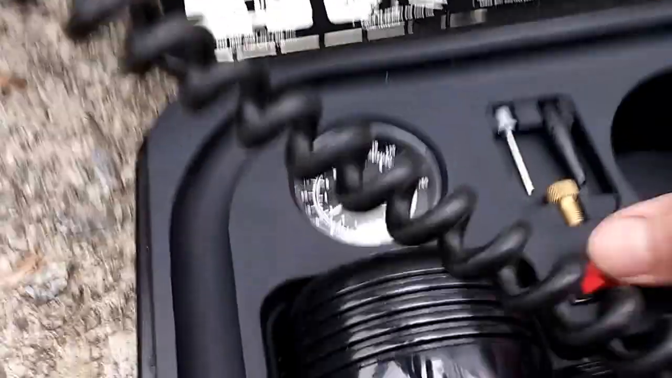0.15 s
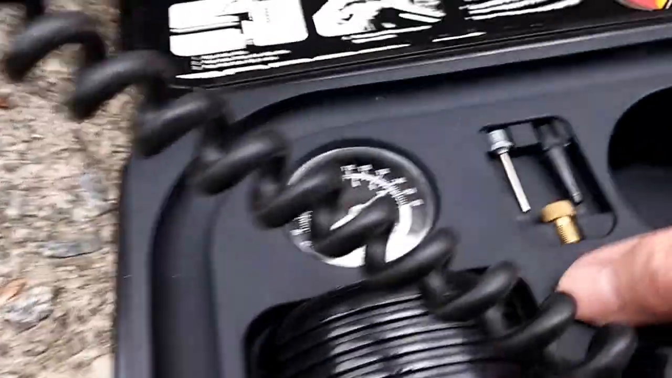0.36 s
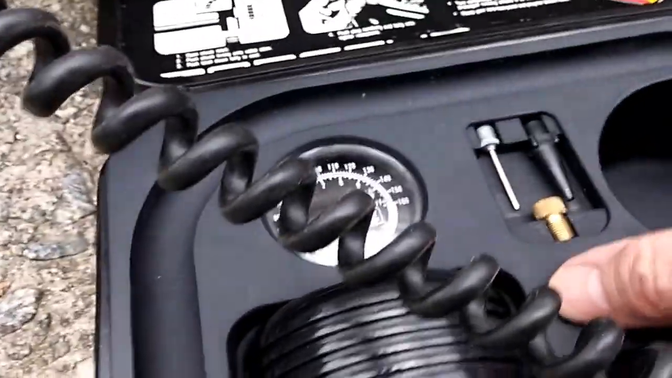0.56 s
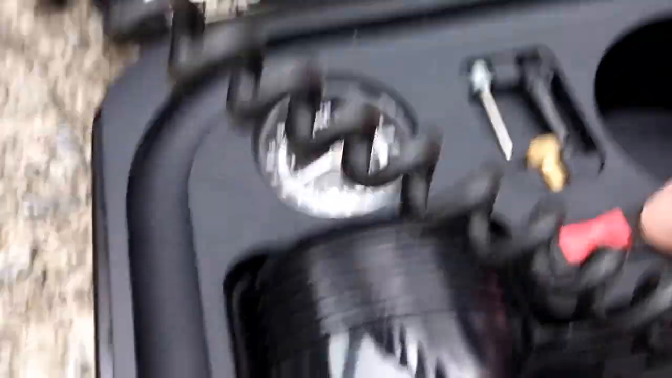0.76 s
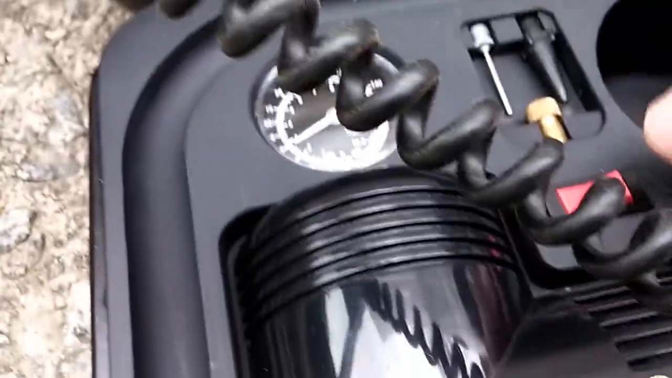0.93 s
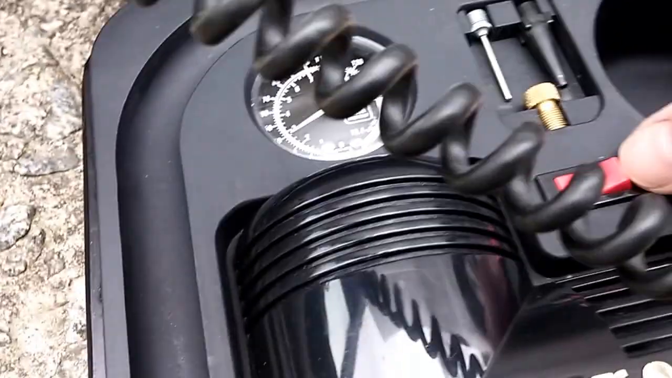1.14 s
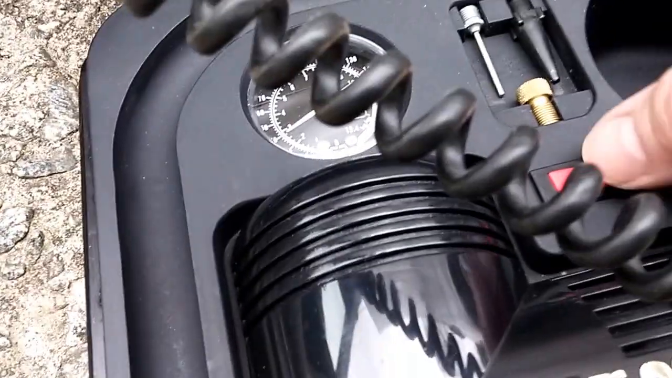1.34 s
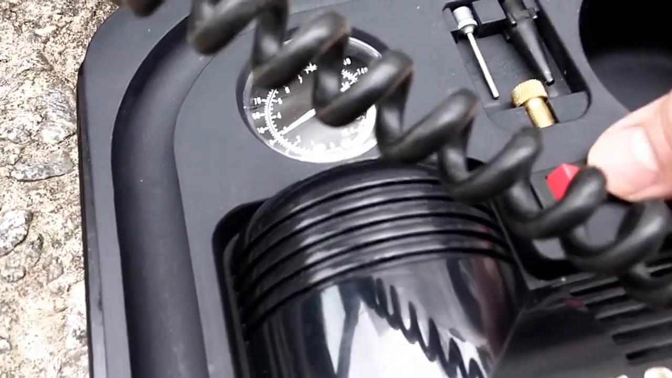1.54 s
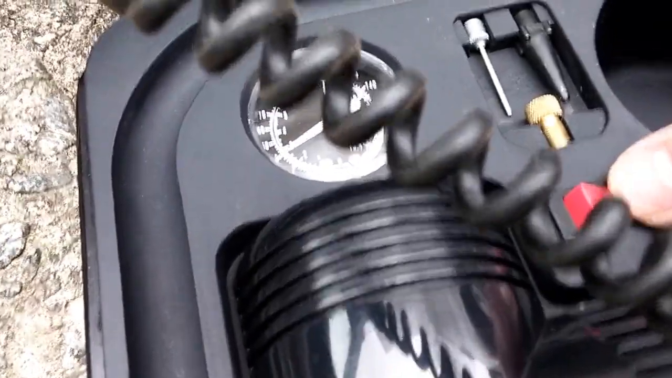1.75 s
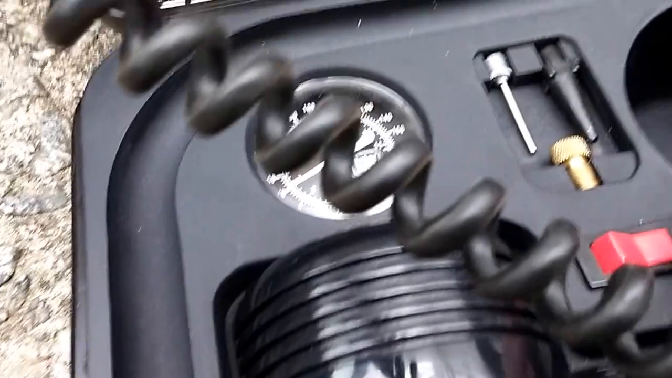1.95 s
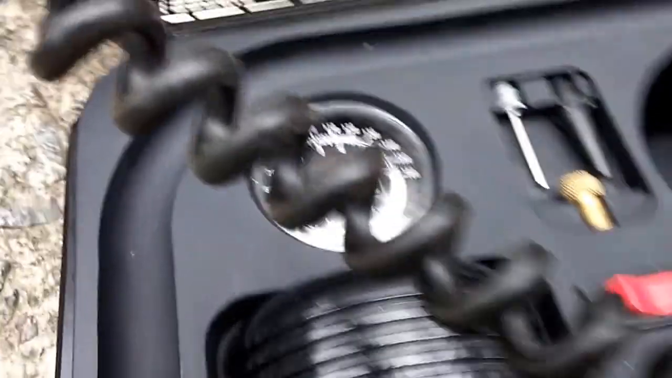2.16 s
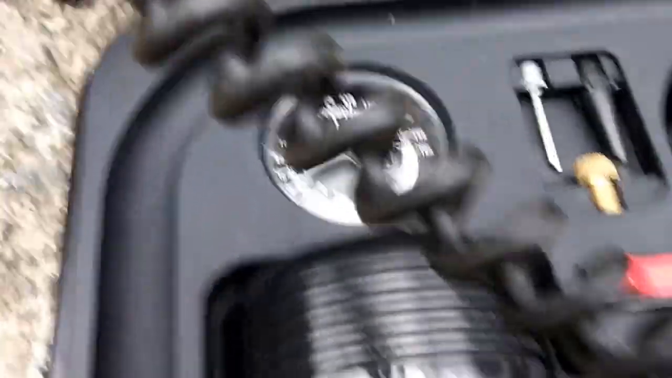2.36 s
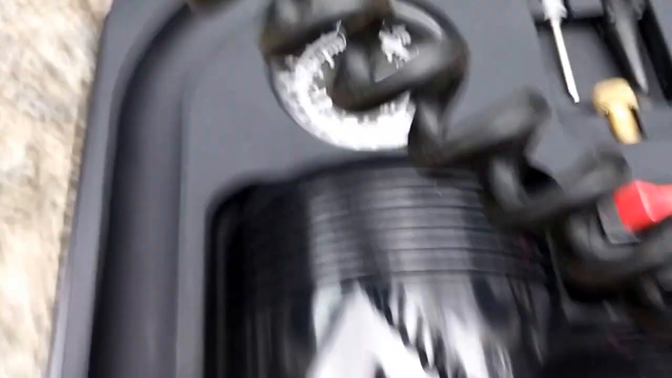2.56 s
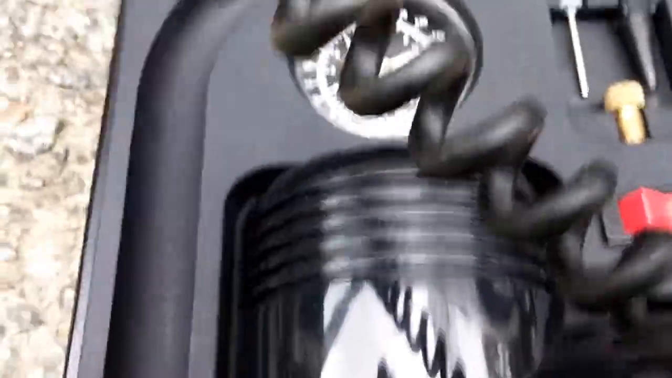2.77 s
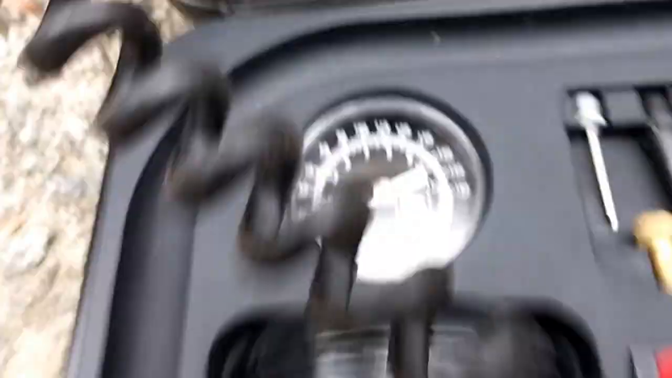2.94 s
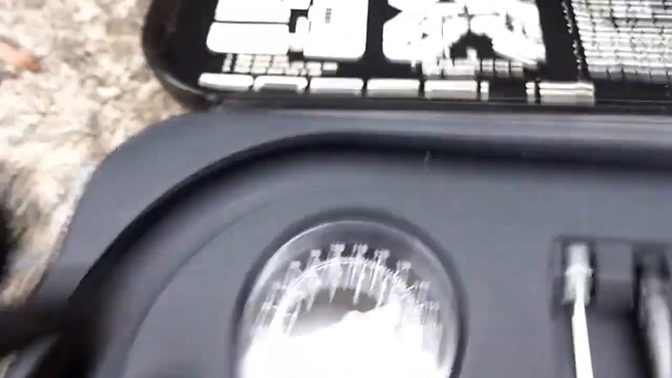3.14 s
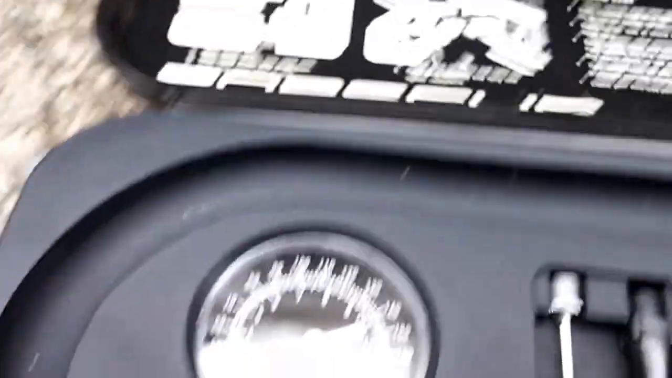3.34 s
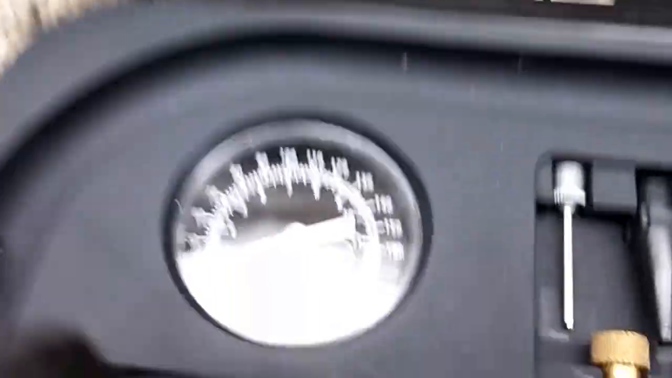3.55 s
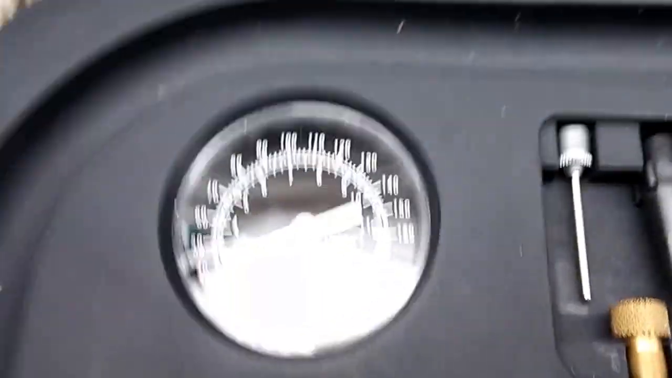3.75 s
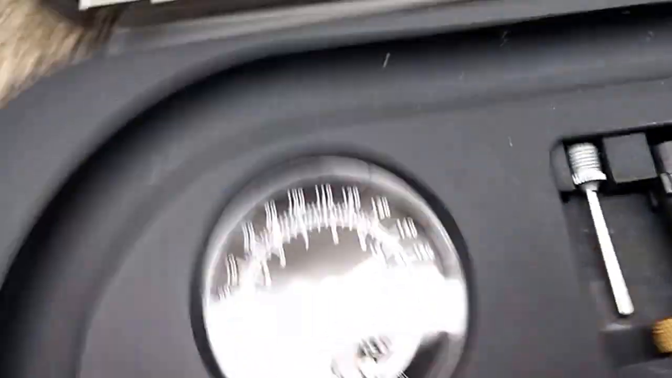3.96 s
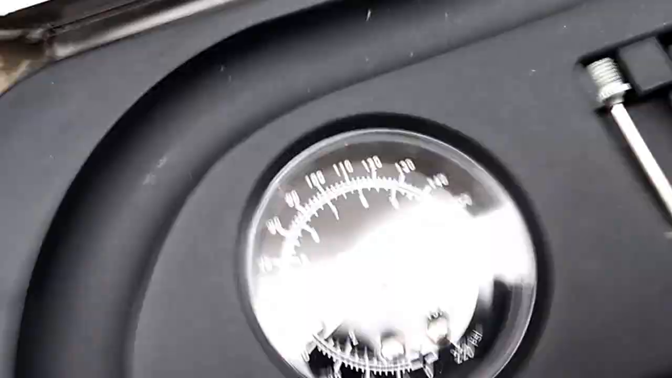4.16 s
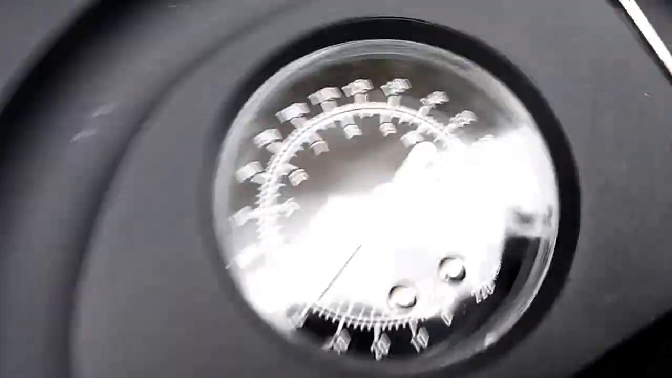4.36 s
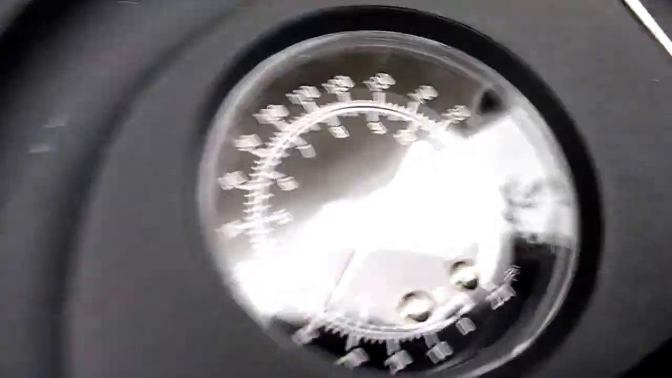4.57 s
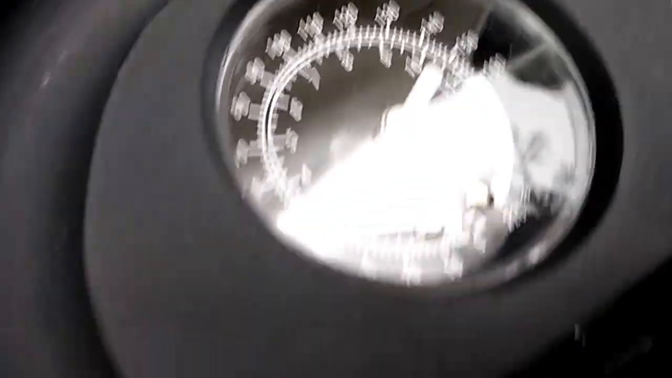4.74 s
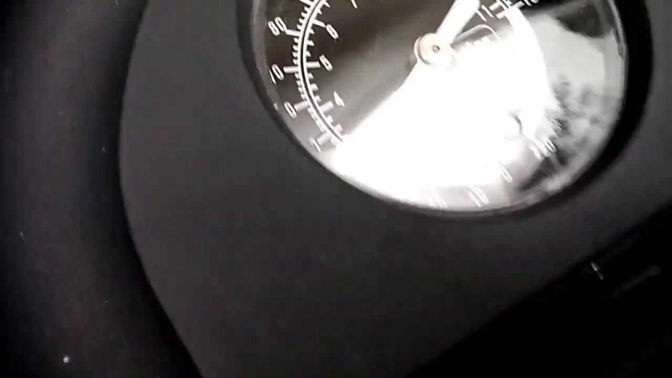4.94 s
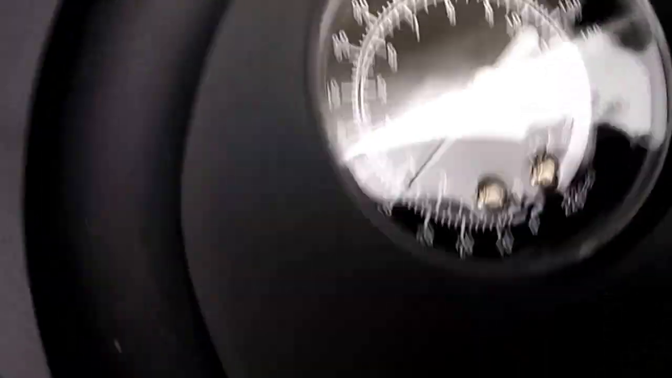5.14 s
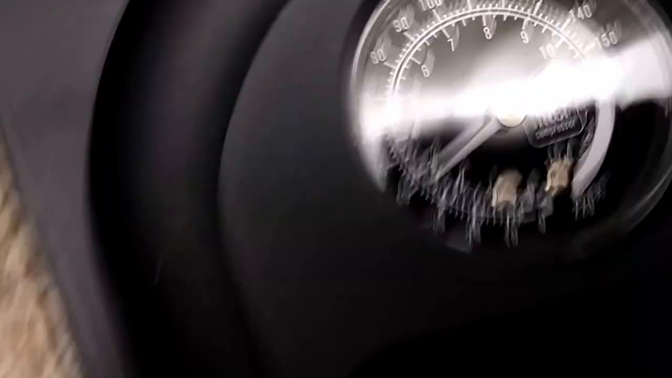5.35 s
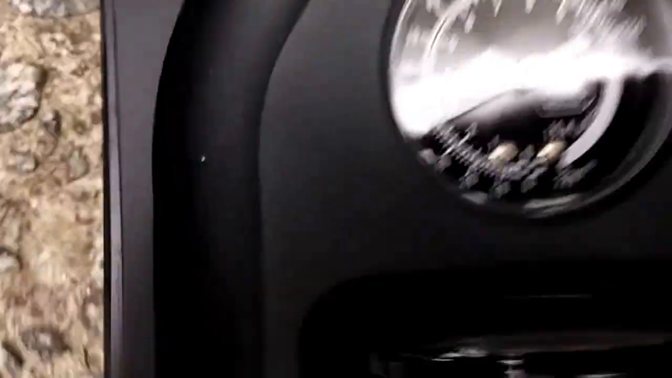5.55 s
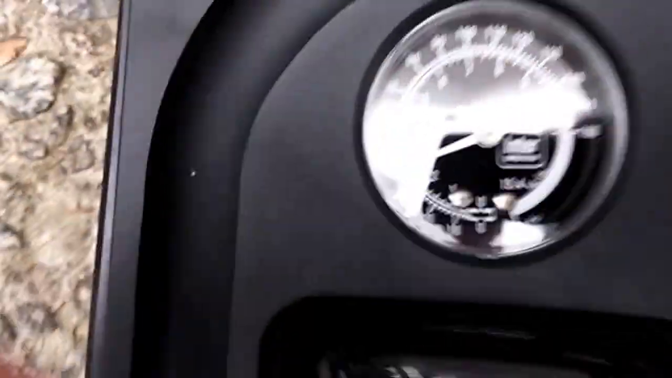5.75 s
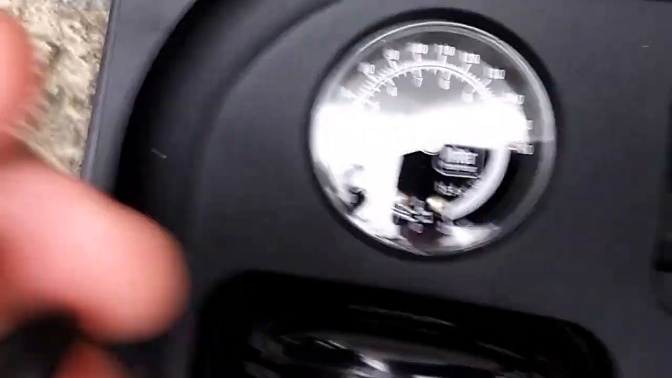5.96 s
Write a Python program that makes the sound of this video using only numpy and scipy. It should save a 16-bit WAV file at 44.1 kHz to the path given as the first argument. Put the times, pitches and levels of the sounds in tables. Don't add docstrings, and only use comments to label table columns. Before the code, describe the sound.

Quiet handling first: faint rustle, dry plastic clicks, a boomy bump on the case, low outdoor rumble. At about a second and a half a rocker switch snaps and a small piston compressor bursts in, a dense buzzing drone with metallic chatter and fast air puffs. The handheld close stereo microphone moves, shifting its brighter parts from left to right until the clip ends.

```python
import sys
import numpy as np
from scipy import signal
from scipy.fft import rfft, irfft, next_fast_len
from scipy.io import wavfile
from scipy.ndimage import uniform_filter1d

SR = 44100
rng = np.random.default_rng(int(sys.argv[2]) if len(sys.argv) > 2 else 0)


def master_out(mix):
    frames = np.transpose(np.atleast_2d(mix))
    ceiling = np.clip(frames, -1, 1)
    pcm = np.round(ceiling * 32767).astype(np.int16)
    wavfile.write(sys.argv[1], SR, pcm)


def how_loud(loudness_db):
    steps = np.asarray(loudness_db, float) / 20
    return 10 ** steps


N = 264600
CLOCK = np.arange(N) / SR
PUMP_START_S = 1.47


def unit(x):
    return x / np.sqrt(np.mean(x ** 2) + 1e-20)


def along(points, hz):
    f, v = np.transpose(points)
    return np.interp(np.log(hz + 1), np.log(f + 1), v)


def curves(rows):
    s, *cols = np.transpose(rows)
    return [np.interp(CLOCK, s, c) for c in cols]


def wobble(rate, count):
    knots = rng.standard_normal((count, int(N * rate / SR) + 2))
    return np.array([np.interp(CLOCK * rate, np.arange(len(k)), k) for k in knots])


def filtered(x, response):
    m = next_fast_len(N + SR // 4)
    return irfft(rfft(x, m) * response(np.fft.rfftfreq(m, 1 / SR)), m)[..., :N]


def ringing(x, modes):
    def response(hz):
        total = 0
        for k, (centre, width, db) in enumerate(modes):
            damping = 1j * hz * width
            total = total + (-1) ** k * how_loud(db) * damping / (centre ** 2 - hz ** 2 + damping)
        return total
    return filtered(x, response)


def pan(db):
    return how_loud(np.array([db / 2, -db / 2]))


# frequency in Hz, likeness 0 to 1.
LIKENESS = [(100, 0.99), (640, 0.64), (1400, 0.22), (3000, 0.14)]


def rush(spectrum):
    def shape(hz):
        turn = np.arccos(np.clip(along(LIKENESS, hz), -1, 1)) / 2
        return how_loud(along(spectrum, hz)) * [np.cos(turn), np.sin(turn)]
    mid, side = filtered(rng.standard_normal((2, N)), shape)
    return unit(np.array([mid + side, mid - side]))


def burst(turns, angle, rise, fall, scatter_db):
    since = (turns - angle) % 1
    strengths = how_loud(scatter_db * rng.standard_normal(200))
    size = strengths[np.floor(turns - angle + 1).astype(int)]
    return size * (1 - np.exp(-since / rise)) * np.exp(-since / fall)


def blows(turns, hits, drift_db, jitter, lag):
    out = np.zeros((2, N))
    running = CLOCK >= PUMP_START_S
    for angle, db in hits:
        whole = np.arange(1, turns[-1] - 1) + angle
        struck = whole + rng.normal(0, jitter, len(whole))
        at = np.interp(struck, turns[running], np.arange(N)[running]).astype(int)
        size = how_loud(db + drift_db * wobble(1.58, count=2)[:, at] + rng.normal(0, 0.25, len(at)))
        out[0, at + round(lag)] += size[0]
        out[1, at] += size[1]
    return out


# time in seconds, crank turns per second in Hz.
CRANK_SPEED = [(1.47, 23.9), (1.51, 28.5), (1.6, 31.9), (1.7, 34.0), (1.85, 33.65), (2.05, 32.87),
               (2.3, 32.2), (2.6, 31.92), (3.0, 31.54), (3.4, 31.4), (3.8, 31.25), (4.2, 31.14),
               (4.6, 31.07), (5.0, 30.99), (5.4, 30.88), (5.7, 30.72), (6.0, 30.73)]
# level in dB with the hose empty, level in dB under pressure.
HUM_LOW = [(-11, -8.5), (-15, -2), (-9, -2), (-2.5, -9), (-0.5, -5), (-14.5, -10.5), (-4.5, -22.5),
           (-11.5, -14), (-27, -4.5), (-24.5, -7.5), (-9.5, -18), (-15.5, -11), (-8, -7), (-6, -20),
           (-15, -11), (-10.5, -14), (-5.5, -15), (-16, -10.5)]
# level in dB with the hose empty, level in dB under pressure.
HUM_HIGH = [(-6.5, -13), (-25, -22), (-15.5, -16), (-11, -5), (-5.5, -11), (-7.5, -13.5), (-26, -13.5),
            (-18.5, -2.5), (-10, -5.5), (-27, -13), (-15.5, -12.5), (-10, -13.5), (-31, -15), (-35, -17.5),
            (-19, -13), (-15, -28), (-16, -17), (-7, -17.5)]
# crank order, settling time in seconds.
SETTLE = [(4, 1.15), (5, 0.18), (7, .2), (8, 1.23), (11, 0.78), (12, 0.18), (25, 0.42), (27, 2), (30, .17)]
STROKE = [(2, .5, 1.6), (11, .65, .45), (18, .8, 1.3), (29, .15, .7)]
# frequency in Hz, width in Hz, lift in dB.
PANELS = [(427.9, 19, 7.5), (983, 20.5, 6.5), (1156, 22, 9)]
# frequency in Hz, phase lead of left in rad (negative: left
LEFT_LEAD = [(100, -0.07), (450, -0.44), (690, -1), (850, -1.35), (975, -1.86), (1150, -2.5)]


def hum(turns):
    step = slice(None, None, 6)
    clock = CLOCK[step]
    angle, speed = 2 * np.pi * turns[step], curves(CRANK_SPEED)[0][step]
    shudder = wobble(25, count=1)[0, step] * 6 * np.exp(-np.abs(clock - 1.5) / 0.15)
    orders = HUM_LOW + HUM_HIGH
    drifts = wobble(2.5, count=len(orders))[:, step]
    filling_s = np.clip(clock - 2.08, 0, None)
    out = 0
    for k, ((empty_db, load_db), drift) in enumerate(zip(orders, drifts), start=2):
        _, stroke, scatter = [row for row in STROKE if row[0] <= k][-1]
        lead = along(LEFT_LEAD, 31 * k) / 2 + rng.normal(0, 0.008 * k)
        phase = k * (angle - 2 * np.pi * stroke) + rng.normal(0, scatter)
        phase = phase + 0.135 * drift + 0.015 * k * shudder
        slack = np.exp(-filling_s / np.interp(k, *np.transpose(SETTLE)))
        panel_db = sum(db * np.exp(-((k * speed - hz) / width) ** 2 / 2) for hz, width, db in PANELS)
        level_db = load_db + slack * (empty_db - load_db) + panel_db
        level = how_loud(level_db + 0.52 * drift + 1.0 * shudder * np.cos(k))
        sides = pan(rng.normal(-0.91, 1.0))[:, None]
        out = out + level * sides * np.sin([phase + lead, phase - lead])
    return unit(signal.resample_poly(out, 6, 1, axis=1)[:, :N])


def motor(turns):
    thirds = np.array([k / 3 for k in range(20, 110) if k % 3])
    sizes = how_loud(10.3 * np.exp(-((thirds - 9.5) / 0.79) ** 2) + rng.normal(0, 2.8, len(thirds)))
    cycle = np.arange(4096) / 4096 * 3
    wave = sizes @ np.sin(2 * np.pi * (np.outer(thirds, cycle) + rng.random((len(thirds), 1))))
    return unit(np.interp(turns, cycle, wave, period=3))


# frequency in Hz, density in dB per Hz.
RATTLE = [(18, -43), (30, -8), (117, -10.5), (252, -13.5), (433, -10.5), (653, -12), (717, -10.5),
          (1080, -7), (2600, -16.5), (3380, -65), (5720, -120)]


def case_hum(turns, since):
    loose_db = -17 + 8 * np.exp(-since / 0.43)
    return how_loud(-11.3) * (hum(turns) + how_loud(-26.5) * motor(turns) + how_loud(loose_db) * rush(RATTLE))


# crank angle in turns, level in dB.
SHELL_KNOCKS = [(-.03, 4.5), (0.098, -11.5), (.27, 0.5), (0.428, 8), (.6, 2.5), (0.699, 6.5)]
# frequency in Hz, width in Hz, level in dB.
SHELL_MODES = [(1128, 160, 1.5), (1333, 62, -2.5), (1454, 77, 5)]
# crank angle in turns, level in dB.
LID_SLAPS = [(.65, 2), (0.0487, -2.2), (.3, -3.5), (0.52, -6)]
# frequency in Hz, width in Hz, level in dB.
LID_MODES = [(1610, 46, -3.5), (1733, 64, -3.5), (1812, 38, -2.5), (1915, 120, -14.5)]
# time in seconds, level in dB.
LID_SIGHT = [(1.47, -2), (2.0, 0.5), (2.25, 0.5), (3.1, 1.5), (3.35, -3), (4.1, -0.5), (5.3, -3),
             (5.6, 0.5), (6.0, 2)]


def knocks(turns, since):
    hits = blows(turns, SHELL_KNOCKS, 3, jitter=.0005, lag=9)
    slaps = blows(turns, LID_SLAPS, 2.2, jitter=.0006, lag=8.8)
    shell = unit(ringing(ringing(hits, SHELL_MODES), [(1314, 600, 0)]))
    lid = unit(ringing(ringing(slaps, LID_MODES), [(1770, 440, 0)]))
    shell_db = -27 - 1.44 * (since - 2)
    lid_db = -23.5 + curves(LID_SIGHT)[0]
    return how_loud(shell_db) * shell + how_loud(lid_db) * lid


# frequency in Hz, width in Hz, level in dB.
REED_MODES = [(2974, 100, 2), (3230, 310, -11), (4060, 360, -14), (4710, 270, -10.5), (5140, 53, -8.5)]


def reed_valve(turns):
    struck = burst(turns, 0.65, 0.0044, 0.077, 2.2) + 0.074 * burst(turns, -0.013, .01, 0.039, 3.1) + 0.11
    flutter = unit(struck * rng.standard_normal((2, N)))
    clicks = unit(blows(turns, [(.6, -14.5), (0.0373, -17)], 2.5, jitter=0.0013, lag=15))
    return unit(ringing(ringing(flutter + 0.68 * clicks, REED_MODES), [(3620, 4700, 0)]))


def gears(turns, lag):
    teeth = rng.standard_normal((6, 1400))
    at = (((turns + .0003 * wobble(30, count=1)[0]) % 1) * 1400).astype(int) % 1400
    wear = wobble(1.8, count=6)
    chatter = np.sum(wear * teeth[:, at], axis=0) / np.linalg.norm(wear, axis=0)
    return np.array([np.roll(chatter, round(lag)), chatter])


# frequency in Hz, density in dB per Hz.
AIR_SPECTRUM = [(1180, -3), (2000, -6), (2570, -8.5), (3010, 1.5), (3460, -6), (3940, 1), (4610, -3),
                (5070, -5.5), (5580, -8.5), (7310, -7.5), (7840, -9), (8930, -4), (12000, -15),
                (12900, -16), (13500, -8.5), (15900, -10.5)]
# frequency in Hz, left over right in dB.
AIR_SIDE = [(60, -5.5), (110, 7), (200, -10), (380, -0.5), (700, -14), (1290, 8), (2380, 5), (4400, -2),
            (8120, -8), (15000, 1)]


def valve_air(turns):
    puff = burst(turns, -0.055, 0.064, 0.047, 0.92) + 0.22 * burst(turns, -0.062, 0.025, 0.33, 1.25)
    flow = 0.22 * burst(turns, 0.64, 0.0095, 0.13, 1.1) + 0.12 + 0.053 * puff

    def heard(hz):
        return how_loud(along(AIR_SPECTRUM, hz)) * pan(along(AIR_SIDE, hz) + 5)

    def nozzle(hz):
        return how_loud(along([(3500, -10.5), (7000, -0.5), (10500, 0.5), (13000, -12)], hz))

    def white(share):
        return share * gears(turns, lag=16) + rng.standard_normal((2, N))

    jet = filtered(puff * white(0.89), lambda hz: heard(hz) * nozzle(hz))
    hiss = filtered(flow * white(.9), heard)
    return unit(unit(jet) + 0.73 * unit(hiss))


def mirrored(x, depth_db):
    z = signal.stft(x, nperseg=256)[2]
    field = uniform_filter1d(rng.standard_normal(z.shape), size=2, axis=1)
    for _ in range(2):
        field = uniform_filter1d(field, size=170, axis=2)
    field = field - uniform_filter1d(field, size=9, axis=1)
    return unit(signal.istft(z * how_loud(depth_db * unit(field)), nperseg=256)[1][:, :N])


# time in seconds, nearness in dB, bearing as left over right
# in dB, sight of the reed valve in dB.
MICROPHONE = [(1.47, -0.5, 7.5, 2.5), (1.95, -1.5, 5, -0.5), (2.26, 0.26, 7.5, 2), (3.03, -0.4, 4.5, 5),
              (3.4, 0.8, -2, -2.5), (3.9, 0.4, -6, -3.5), (4.4, 0.6, -2, -10), (4.94, 0, -6, 1.5),
              (5.29, -0.1, -3, -0.6), (5.56, -1.5, -6, -17), (6.0, -2.5, -5.5, -25)]


def pump():
    running = CLOCK >= PUMP_START_S
    since = np.clip(CLOCK - PUMP_START_S, 0, None)
    turns = np.cumsum(curves(CRANK_SPEED)[0] * running) / SR
    near_db, bearing_db, sight_db = curves(MICROPHONE)
    body = case_hum(turns, since) * pan(0.16 * bearing_db)
    knocked = knocks(turns, since) * pan(1.44 * bearing_db)
    reed = how_loud(-29 + sight_db) * reed_valve(turns)
    air = how_loud(-18) * mirrored(valve_air(turns), depth_db=2.5) * pan(-8 + 0.34 * bearing_db)
    spin_up_db = -28.5 * np.exp(-since / 0.039)
    return running * how_loud(near_db + spin_up_db) * (body + knocked + reed + air)


# time in
# seconds, peak in dB, boom in dB, brightness in dB, left over right in dB.
TOUCHES = [(0.447, -7.5, -25, 0, -2), (0.466, -8, -16.5, -37, 2), (0.523, -20, -13.5, -30, 1.5),
           (0.828, -23, -19, -8, 3), (0.842, -31.5, -2.5, -3, -7), (0.857, -28, -15, -10, 4),
           (0.898, -40, -12, -14, 1.5), (0.988, -31, -11.5, -35, 1), (1.049, -48, 0, -33.5, 0.5),
           (1.083, -42.5, -3, -37, 3), (1.174, -13, -22, -25.5, 1.5), (1.184, -37, 10, -32, -1),
           (1.219, -41, 3.5, -23.5, 1.0), (1.439, -38, -22, -30, 1), (1.473, -3.5, -31, 7, 0.5),
           (1.518, -4, -10, -25, -3)]
# frequency in Hz, density in dB per Hz.
THUD = [(150, -7.5), (500, -1.5), (900, -2), (1250, -1), (1600, -8), (2200, -17), (4000, -21),
        (9000, -39.5)]
# frequency in Hz, density in dB per Hz.
CRACK = [(1500, -7.5), (3000, -8), (5000, -6.5), (7800, 1.5), (10500, -10.5), (15500, -20)]
# frequency in Hz, width in Hz, level in dB.
CASE_MODES = [(176.6, 22.9, 3), (329, 310, -19), (650, 200, -22), (1280, 89, -15.5)]


def touches():
    thud_t60_s, crack_t60_s = 0.1, .048
    thud, crack, push = np.zeros((3, 2, N))
    t = np.arange(SR // 4) / SR
    creak = 1 / (1 + np.exp((.006 - t) / 0.001))
    gate = 1 / (1 + np.exp((t - .05) / 0.014))
    for s, db, boom_db, bright_db, pan_db in TOUCHES:
        start = round(s * SR) - 260
        at = slice(start, start + len(t))
        rise = pan(pan_db)[:, None] * creak
        thud[:, at] += rise * how_loud(db - 10.5 - 60 * t / thud_t60_s)
        crack_level = how_loud(db + min(bright_db, 0) + 2.5)
        crack[:, at] += rise * crack_level * (how_loud(-60 * t / crack_t60_s) + 0.016 * gate)
        push[:, round(s * SR)] = how_loud(db + boom_db + 50)
    grit = how_loud(3.4 * wobble(350, count=1))
    boom = ringing(ringing(push, CASE_MODES), [(250, 1400, 0.6), (1250, 550, -3)])
    return grit * (thud * rush(THUD) + crack * rush(CRACK)) + boom


# start in seconds, length in seconds, level in dB.
SLIDES = [
    (0.214, 0.0087, -46),
    (0.275, .015, -56.5),
    (0.508, .06, -58),
    (0.6, .058, -53),
    (1.211, 0.054, -66),
]
# frequency in Hz, density in dB per Hz.
SKIN = [(350, -49), (600, -15), (687, -2), (890, -11), (1060, -8.5), (1880, -11), (2220, -25), (2680, -9),
        (4030, -21), (5010, -10.5), (15500, -29.5)]


def fingers():
    level = 0
    for s, hold, db in SLIDES:
        swell_db = 1300.5 * np.clip(s - CLOCK, 0, None)
        fade_db = 600.5 * np.clip(CLOCK - s - hold, 0, None)
        level = level + how_loud(db - swell_db - fade_db)
    return level * how_loud(2.2 * wobble(200, count=1)) * rush(SKIN)


# frequency in Hz, density in dB per Hz.
HOSE_RUB = [(180, -65), (300, -26), (616, -13), (1090, -23.5), (1520, 1.5), (1910, -34), (2070, -12),
            (2400, -26), (3330, -13), (5010, -25), (15000, -38)]


def hose():
    slacken_db = 88 * np.clip(CLOCK - 0.059, 0, None)
    stop_db = 900 * np.clip(CLOCK - 0.35, 0, None)
    return how_loud(-46.5 - slacken_db - stop_db + 1.3 * wobble(40, count=1)) * rush(HOSE_RUB)


# time in seconds, level in dB.
STIR = [(0, -54), (0.08, -49), (0.138, -51), (0.27, -59), (0.52, -46), (0.7, -55.5), (1.064, -51),
        (1.256, -52.5), (1.47, -71)]
# frequency in Hz, density in dB per Hz.
RUMBLE = [(15, -69), (25, -24), (43, -18), (75, -11), (108, -13), (400, -32.5), (520, -66.5), (880, -120)]
# frequency in Hz, density in dB per Hz.
MURMUR = [(150, -46), (250, -25), (412, -8.5), (457, -8.5), (3000, -30), (3900, -77.5), (6600, -120)]
# frequency in Hz, density in dB per Hz.
RUSTLE = [(880, -30.5), (1500, -4.5), (1770, -8), (2330, -18), (2490, -13.5), (15500, -22.5)]


def outdoors():
    stir_db, = curves(STIR)
    murmur_db = -65 + 1.1 * (stir_db + 53.5)
    rumble = how_loud(stir_db + 3.3 * wobble(25, count=1)) * rush(RUMBLE)
    murmur = how_loud(murmur_db + 2.0 * wobble(61, count=1)) * rush(MURMUR)
    rustle = how_loud(-72.5 + 20.5 * np.exp(-CLOCK / .2)) * rush(RUSTLE)
    return rumble + murmur + rustle


def scene():
    return pump() + touches() + fingers() + hose() + outdoors()


def low_pass(x):
    return signal.sosfilt(signal.butter(12, 15800, fs=SR, output="sos"), x)


def record(dry):
    heard = filtered(dry, lambda hz: (1j * hz / (1j * hz + 28)) ** 2)
    saturated = heard / (1 + np.abs(heard / 0.74) ** 8) ** (1 / 8)
    return low_pass(saturated)


dry = scene()
out = record(dry)
master_out(out)
```